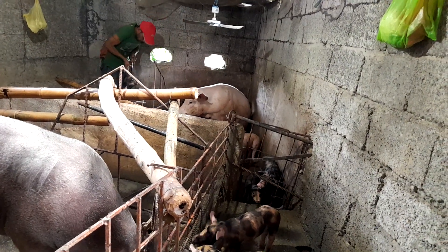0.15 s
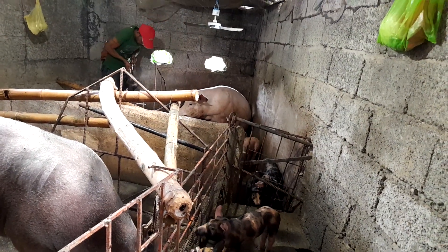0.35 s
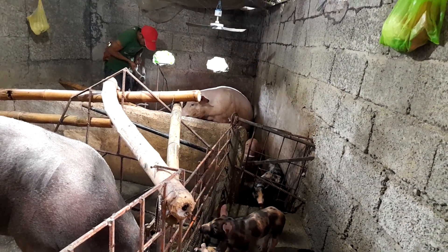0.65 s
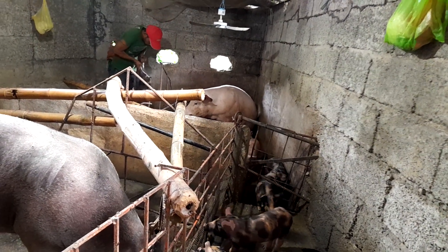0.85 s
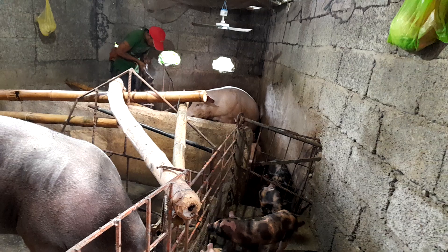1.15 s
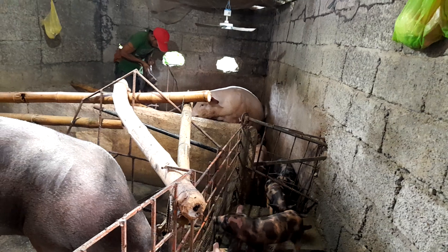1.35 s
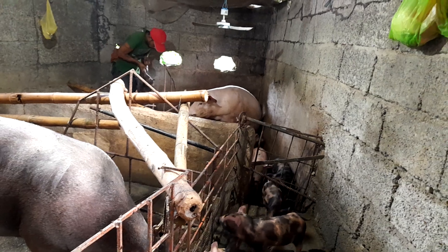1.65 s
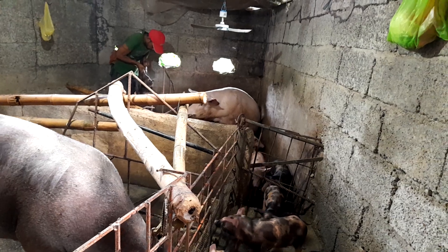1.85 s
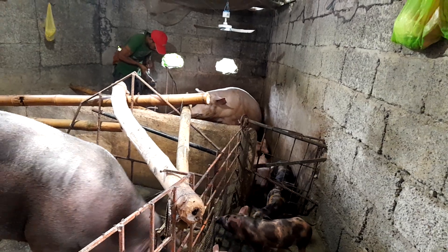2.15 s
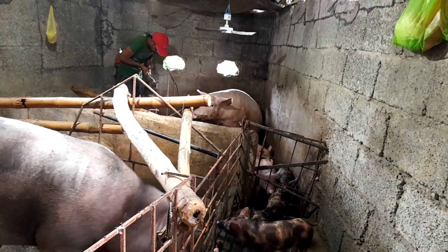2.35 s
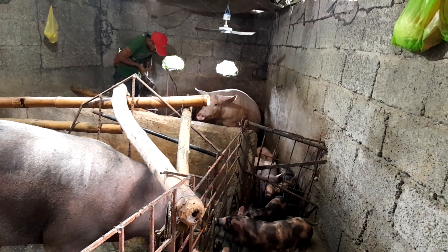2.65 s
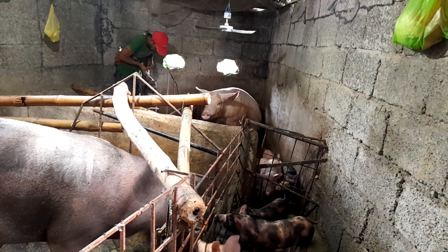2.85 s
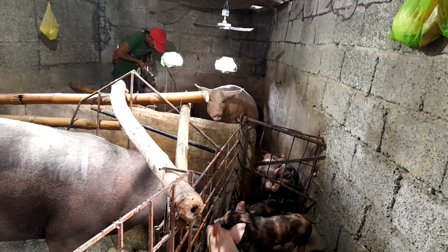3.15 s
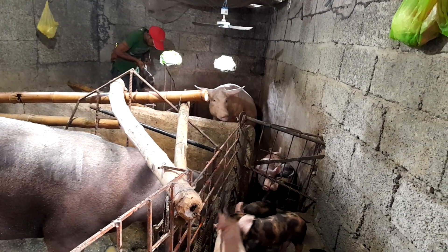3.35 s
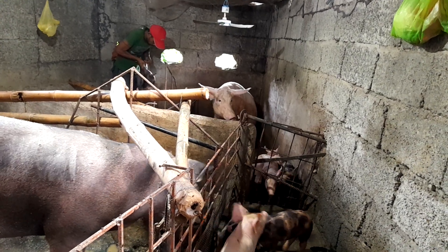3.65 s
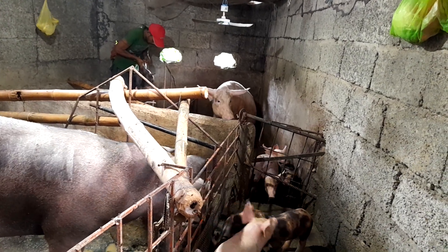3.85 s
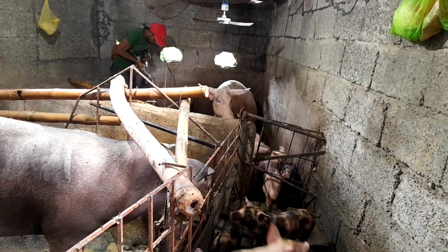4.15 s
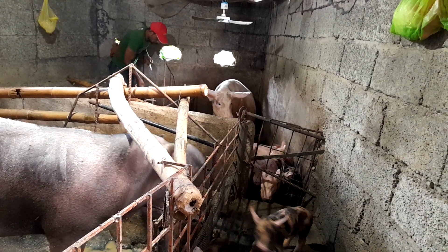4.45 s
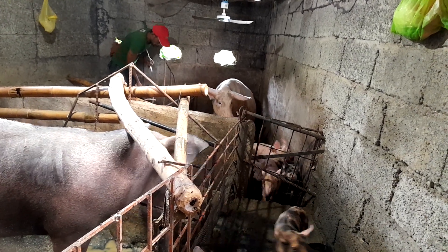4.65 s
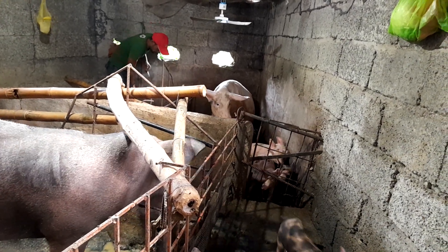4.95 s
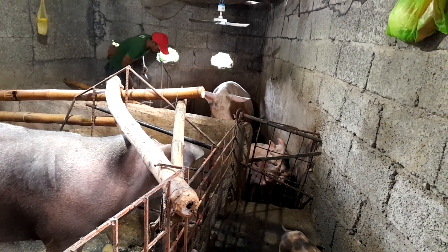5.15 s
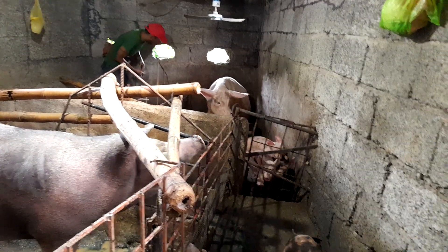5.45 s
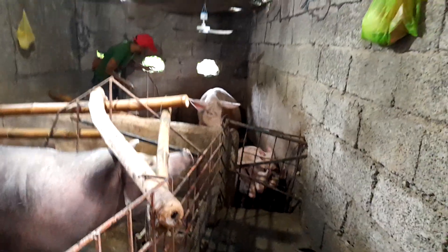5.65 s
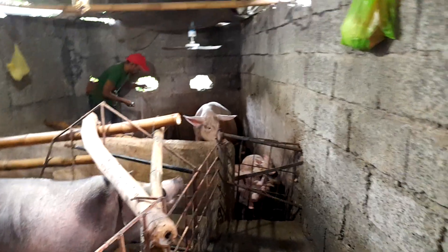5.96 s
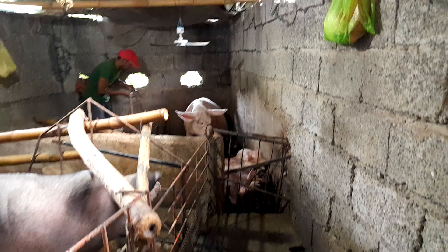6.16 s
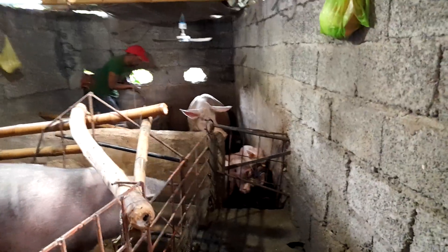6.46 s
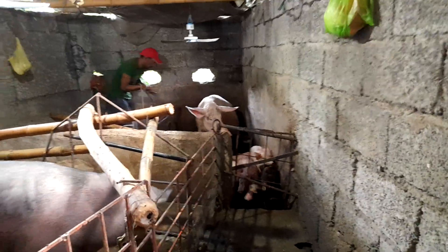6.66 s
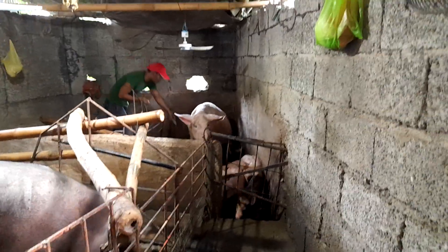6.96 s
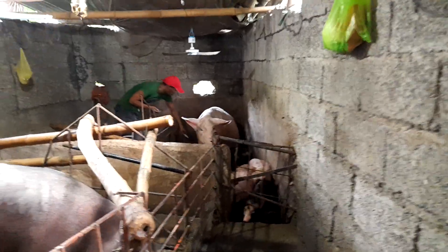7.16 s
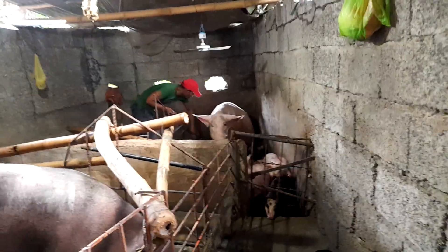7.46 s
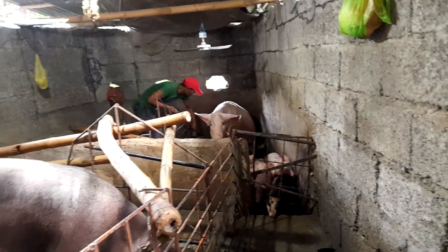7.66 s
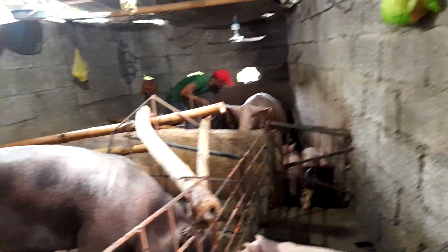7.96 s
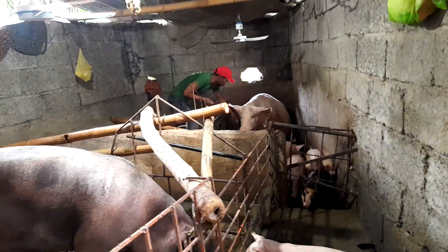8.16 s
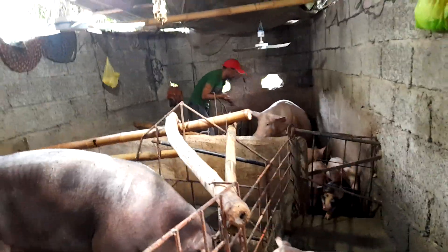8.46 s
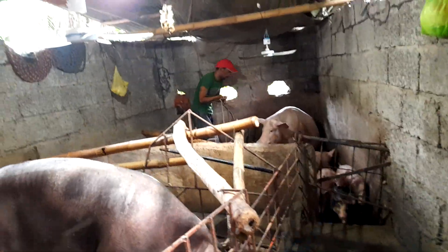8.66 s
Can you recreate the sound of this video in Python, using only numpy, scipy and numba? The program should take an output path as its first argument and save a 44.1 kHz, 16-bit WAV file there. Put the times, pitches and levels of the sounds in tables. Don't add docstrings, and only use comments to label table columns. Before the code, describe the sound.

A piglet close by barks hoarsely, then lets out piercing squeals in a hard-walled pig shed, while sows grunt, snort and clink against metal bars.

```python
import sys
import numpy as np
from scipy import signal
from scipy.fft import rfft, irfft, next_fast_len
from scipy.io import wavfile
from scipy.ndimage import uniform_filter1d, minimum_filter1d
from numba import njit

SR = 44100
rng = np.random.default_rng(int(sys.argv[2]) if len(sys.argv) > 2 else 0)


def to_wav(sig):
    pcm = np.clip(np.atleast_2d(sig), -1, 1) * 32767
    pcm = np.round(pcm).astype(np.int16)
    wavfile.write(sys.argv[1], SR, pcm.T)


def attenuation_scalar(level_db):
    decades = np.asarray(level_db, float) / 20
    return 10 ** decades


N = 388962
TIME = np.arange(N) / SR
SLOW_TIME = TIME[::64]

# (frequency [Hz], level [dB])
SHED_AIR = [(15, -70), (25, 5.5), (157, 2.5), (486, -5), (1820, -17), (2810, -8.5), (6490, -19.5),
            (8730, -25.5), (13800, -20), (15800, -30)]
SHED_AIR_DB = -51.5
LULL_S, LULL_HALF_LENGTH_S, LULL_DB = 5.28, .12, -7
# (frequency [Hz], level [dB])
PHONE_SHADOW = [(300, 12), (1200, 1.5), (2400, -12), (4400, -10), (8000, -5.5), (15000, -2)]

# (time [s], peak level [dB], ring [Hz], t60 [s])
TICKS = [(0.575, -35, 1300, .01), (1.72, -31, 2370, 0.0061), (2.473, -26, 1500, .01),
         (4.497, -25, 3000, 0.022), (4.594, -35, 3400, .01), (4.793, -18.5, 4230, 0.0023),
         (5.69, -35, 1500, 0.0088), (5.787, -12, 3170, 0.01), (5.926, -6, 4260, 0.0017),
         (5.951, -15.5, 915, 0.0036), (5.997, -14.5, 2920, 0.0016), (6.067, -37, 3170, 0.012),
         (6.482, -30, 832, 0.094), (6.775, -24.5, 2680, 0.0025), (6.929, -28.5, 2880, 0.014),
         (7.004, -23, 3500, 0.023), (7.021, -18, 3500, 0.028), (7.774, -33.5, 668, 0.099),
         (8.099, -23.5, 3110, 0.027), (8.159, -33, 3100, 0.0098), (8.268, -28, 4120, 0.0042),
         (8.523, -42, 695, 0.017), (8.691, -17, 3200, 0.0035)]
# (time [s], level [dB], pitch [Hz], t60 [s])
THUMP = [
    (1.98, -24, 64, .6),
]

# (peak time [s], hold [s], level [dB], brightness [dB])
SNORTS = [(5.377, 0.019, -60.5, -22.5), (5.504, 0.0079, -44, -29), (5.781, 0.011, -32.5, -8.5),
          (5.912, .005, -54, 33.5), (6.02, 0.015, -41, -3), (6.227, 0.019, -46, -2),
          (6.487, 0.0068, -43, 1), (6.768, 0.011, -45, 6.5), (6.938, 0.01, -38, -8),
          (7.027, 0.0088, -33.5, -4.5), (7.248, 0.066, -46, -4), (7.611, 0.011, -46.5, -2),
          (7.795, 0.091, -40.5, -7), (8.041, 0.12, -41.5, -2.5), (8.271, 0.017, -42, 9),
          (8.566, 0.018, -39.5, -3), (8.693, 0.028, -34, 2)]
# (frequency [Hz], width [Hz], level [dB])
SNOUT = [(1244, 44, -6), (1760, 1200, -6.5), (2950, 330, -1), (3900, 1500, -1.5), (6200, 970, -2),
         (11000, 2500, 0.5)]

# (peak time [s], hold [s], chest level [dB], nose re chest [dB], nose resonance [Hz])
FAR_GRUNTS = [(0.0, .01, -50, 5, 440), (0.104, .01, -56, 18, 462), (0.318, 0.016, -46.5, 9, 423),
              (0.614, 0.035, -51.5, 14, 470), (0.777, 0.077, -44, -1, 332), (0.918, 0.11, -37, -1.5, 320),
              (1.162, 0.21, -52.5, 6.5, 424), (1.44, 0.018, -50.5, 16, 514), (1.788, 0.0079, -43, 0.5, 544),
              (2.017, 0.024, -34.5, 4.5, 299), (2.27, .01, -47.5, 5, 430), (2.47, 0.032, -42, 0, 440),
              (3.373, 0.051, -53.5, -25, 336), (3.914, 0.0091, -54, -14, 497), (4.12, 0.16, -50, -5, 348)]
# (peak time [s], hold [s], chest level [dB], nose re chest [dB], nose resonance [Hz])
NEAR_GRUNTS = [(4.42, 0.11, -42, -2, 296), (4.64, 0.011, -38, -4, 472), (4.841, 0.0091, -40, -1.5, 486),
               (5.081, 0.026, -40.5, -4.5, 465), (5.221, 0.0072, -55, -22, 407),
               (5.517, 0.0067, -45, 5.5, 302), (5.75, 0.16, -40.5, 1.5, 332), (6.02, 0.043, -35, -3, 447),
               (6.26, 0.0054, -32.5, -6.5, 422), (6.63, 0.028, -42, 2, 467), (6.942, 0.043, -37.5, -4, 450),
               (7.04, 0.025, -39.5, 3, 314), (7.286, 0.018, -32, -3.5, 441), (7.632, 0.048, -40, -1.5, 427),
               (7.848, 0.027, -33.5, 0.5, 331), (8.07, 0.089, -35, -2.5, 413),
               (8.28, 0.004, -35.5, -6, 554), (8.57, 0.048, -48.5, 7.5, 310), (8.71, 0.037, -33, -4.5, 427)]

# (throat opens [s], peak level [dB], brightness [dB], mouth resonance [Hz], palate resonance [Hz])
BARKS = [
    (.058, -30, -3, 2690, 3900),
    (.318, -28, -5, 2665, 4100),
    (.574, -26, -3.5, 2850, 3900),
    (.848, -29.5, -1, 2650, 4000),
]
# (throat opens [s], peak level [dB], brightness [dB], mouth resonance [Hz], palate resonance [Hz])
PANTS = [
    (4.369, -36.5, -9, 2510, 4100),
    (4.494, -43, -11, 2960, 4260),
    (4.594, -28.5, -14, 2820, 3450),
    (4.791, -34.5, -13.5, 2410, 3220),
    (5.04, -46.5, -11, 2590, 3840),
]
# (time [s], effort [dB], brightness [dB], mouth resonance [Hz])
CRIES = [
    [(1.13, -46, -18, 2640), (1.2, -42, 0.5, 2760), (1.29, -40.5, 1, 2540), (1.36, -21, -15.5, 2450),
     (1.39, -36, 2.5, 2240), (1.45, -22.5, -4.5, 2650), (1.52, -45, -0.5, 2740), (1.62, -62, -29, 2680)],
    [(1.686, -61, -41, 2360), (1.72, -27, -18, 2860), (1.84, -26, -7.5, 2728), (1.95, -16, -17, 2390),
     (2.06, -38, -18.5, 2950), (2.2, -49, -6.5, 2560)],
    [(2.236, -33.5, -9.5, 2140), (2.265, -12.5, -7.5, 2620), (2.33, -20.5, -16.5, 2530),
     (2.38, -34, -5, 2460), (2.46, -71, -12.5, 2500)],
    [(2.474, -28.5, -7.5, 2680), (2.55, -18, -5, 2990), (2.8, -19.5, -5.5, 2350), (2.94, -18.5, -9, 3040),
     (3.3, -20.5, -10, 2580), (3.39, -101, -18, 2290), (3.5, -66, -15, 2530)],
    [(3.54, -45, -1, 2820), (3.59, -32, 3.5, 2660), (3.65, -30, -3.5, 3840), (4.1, -20, -10, 3070),
     (4.22, -18, -10, 2830), (4.34, -104, 14, 2780)],
]
# (palate resonance [Hz], scoop [share], throat level [dB])
CRY_JAW = [
    (4270, 0.24, 5),
    (3500, 0.64, -3.5),
    (3400, 0.35, -4),
    (3900, 0.49, -4.5),
    (4000, 0.37, 0),
]
# (time [s], whistle [Hz], fold rate [Hz], hoarseness re clear tone [dB])
SQUEALS = [
    [(1.295, 2050, 1300, -11), (1.335, 2640, 1272, -19), (1.41, 2520, 1276, -3)],
    [(2.25, 2500, 561, -4), (2.29, 2708, 587, -4), (2.38, 2763, 563, -3)],
    [(1.69, 1900, 800, -15), (1.735, 2650, 800, -22), (1.77, 2930, 800, -24), (1.85, 2760, 700, -23),
     (1.94, 2680, 620, -18), (2.02, 2660, 600, -6)],
    [(2.55, 2877, 720, -4), (2.63, 2850, 780, -7), (2.69, 2770, 900, -4), (2.76, 2648, 730, -5),
     (2.82, 2690, 680, -21), (2.94, 2830, 640, -19), (3.1, 2823, 635, -19), (3.25, 2840, 625, -21),
     (3.31, 2840, 610, 0)],
    [(3.63, 2757, 563, -3), (3.74, 2785, 557, -30), (3.87, 2772, 554.4, -38), (3.96, 2835, 567, -38),
     (4.02, 2790, 558, -38), (4.11, 2800, 560, -30), (4.18, 2885, 600, -12), (4.25, 2800, 705, -5)],
]
SQUEAL_FOLDS = [
    (.07, .13, .6),
    (.55, .04, .6),
    (.05, .17, .6),
    (.97, .038, .08),
    (.9, .025, .6),
]
SIDEBANDS = (.15, .5, .8, .7, 1.1, .6, .25)
# (peak time [s], hold [s], level [dB], pitch [Hz], waver [share])
CHIRPS = [(0.111, 0.02, -27.5, 2296, 0.027), (0.144, .01, -41, 1360, 0.026),
          (0.365, 0.031, -28.5, 4300, .035), (0.367, 0.027, -56, 1330, 0.16),
          (0.459, .01, -38.5, 2100, 0.11), (0.628, .02, -33, 2567, .05), (0.886, 0.024, -29.5, 4150, 0.026),
          (4.374, 0.033, -41, 2380, 0.048), (4.629, 0.021, -32, 2017, 0.054),
          (4.636, 0.015, -45, 1345, 0.049), (4.853, 0.025, -34, 2170, 0.0254),
          (4.856, 0.014, -43, 1107, 0.0283), (7.537, 0.026, -61, 1415, 0.071),
          (7.83, .03, -38.5, 2750, 0.052), (8.35, 0.11, -62, 1664, 0.0086),
          (8.717, 0.024, -48.5, 1208, 0.051), (0.124, .02, -37, 4660, 0.025), (.13, .02, -36, 6700, 0.047),
          (0.353, .03, -38, 6540, 0.046), (0.389, .02, -48, 2680, .03), (0.623, .02, -33, 5900, 0.048),
          (.9, .03, -51.5, 6300, 0.046), (1.216, .09, -36.5, 3900, 0.024), (1.24, .05, -44.5, 1306, 0.014),
          (1.25, .03, -40, 2530, 0.019), (1.29, .03, -32.5, 4980, 0.032), (1.414, .06, -26.5, 5040, .04),
          (1.38, .09, -28.5, 6510, 0.034), (2.228, .02, -39, 1173, 0.026), (2.5, .03, -29.5, 1722, .05),
          (2.596, .13, -45, 875, 0.0306), (2.633, .06, -26.5, 8406, 0.021), (2.868, .22, -41, 1347, .025),
          (3.549, .01, -37, 1867, 0.037), (3.552, .04, -48.5, 968, 0.059), (3.578, .05, -35.5, 1706, 0.051),
          (3.626, .04, -40.5, 3350, .03), (3.3, 0.022, -26.5, 2455, 0.057), (4.21, 0.038, -22, 2507, 0.056),
          (2.0, 0.02, -33.5, 3300, .1), (4.6, 0.035, -42.5, 731, 0.095), (7.02, 0.037, -50, 650, .08)]
# (time [s], pitch [Hz])
BARK_PITCH = [(0, 440), (1.2, 401.7), (1.5, 540), (2.2, 523), (3.55, 478), (4.4, 427.8), (5.3, 440)]
# (frequency [Hz], width [Hz], level [dB])
BARK_MOUTH = [(440, 18, -9.5), (1385, 31, 1.5), (2990, 680, 8.5), (6180, 275, 14), (6100, 510, 17.5),
              (13480, 10000, 18.5)]
# (frequency [Hz], level [dB])
SQUEAL_MOUTH = [(300, -62.5), (560, -36.5), (1100, -10), (1700, -5), (2250, 0.5), (3000, 12), (4400, -3.5),
                (6100, -1), (7400, -11.5), (9000, -18.5), (11500, -13), (14000, -8.5), (15800, -17.5)]


def curves(table):
    s, *columns = np.transpose(table)
    return [np.interp(TIME, s, column) for column in columns]


def colour(x, points):
    size = next_fast_len(x.shape[-1])
    hz, db = np.transpose(points)
    log_hz = np.log(np.fft.rfftfreq(size, 1 / SR) + 1)
    gain = attenuation_scalar(np.interp(log_hz, np.log(hz), db))
    return irfft(rfft(x, size) * gain, size)[..., :x.shape[-1]]


def even(x, span_s=0.14):
    power = uniform_filter1d(x ** 2, int(span_s * SR)).clip(0)
    return x / np.sqrt(power + 1e-12)


def band(x, lo_hz, hi_hz):
    return signal.sosfilt(signal.butter(3, [lo_hz, hi_hz], "bandpass", fs=SR, output="sos"), x)


def share(x, lo_hz, hi_hz):
    size = next_fast_len(len(x))
    hz = np.fft.rfftfreq(size, 1 / SR) + 1

    def above(edge_hz):
        return np.sin(np.pi / 4 * (1 + (np.log(hz / edge_hz) / .09).clip(-1, 1))) ** 2

    return irfft(rfft(x, size) * above(lo_hz) * (1 - above(hi_hz)), size)[:len(x)]


def walk(rate_hz):
    k = int(SR / rate_hz)
    held = np.repeat(rng.standard_normal(N // 20)[:N // k + 1], k)
    return uniform_filter1d(uniform_filter1d(held, k), k)[:N]


def bursts(peak_s, hold_s, db, slopes):
    peak_s, hold_s, db = (np.reshape(v, (-1, 1)) for v in (peak_s, hold_s, db))
    rise = slopes[0] * (peak_s - SLOW_TIME).clip(0)
    fall = slopes[1] * (SLOW_TIME - peak_s - hold_s).clip(0)
    return db - rise - fall


def blend(levels_db, *traits):
    power = attenuation_scalar(2 * levels_db.clip(-120))
    total = power.sum(axis=0)
    tracks = [10 * np.log10(total)]
    for trait in traits:
        tracks.append((power * np.reshape(trait, (len(power), -1))).sum(axis=0) / total)
    return [np.interp(TIME, SLOW_TIME, track) for track in tracks]


@njit
def resonance(x, hz, width):
    y, b, l = np.empty(len(x)), 0., 0.
    for i in range(len(x)):
        g, k = np.tan(np.pi * hz[i] / SR), width / hz[i]
        v = (b + g * (x[i] - l)) / (1 + g * (g + k))
        b, l, y[i] = 2 * v - b, l + 2 * g * v, k * v
    return y


@njit
def flap(hz, stretch, size):
    pulses, phase, p, k = np.zeros(len(hz)), np.empty(len(hz)), 0., 0
    for i in range(len(hz)):
        p += hz[i] * stretch[k] / SR
        if p >= 1:
            p, k = p - 1, k + 1
            pulses[i] = size[k]
        phase[i] = p
    return pulses, phase


def folds(hz, jitter, scatter_db, air_db, puff):
    chance = rng.standard_normal((N // 40, 2)).T
    pulses, phase = flap(hz, np.exp(jitter * chance[0]), attenuation_scalar(scatter_db * chance[1]))
    air = rng.standard_normal(N) * np.exp(-phase / puff)
    return pulses / pulses.std() + attenuation_scalar(air_db) * air / air.std()


def tract(x, modes, drift_db):
    out = np.zeros(N)
    for k, (hz, width, db) in enumerate(modes):
        ring = resonance(x, hz * attenuation_scalar(drift_db * walk(7.7)), 1. * width)
        out += (-1) ** k * attenuation_scalar(db) / np.sqrt(width) * ring
    return out


def shed(near):
    mid, side = colour(rng.standard_normal((2, N)), SHED_AIR)
    side = signal.sosfilt(signal.butter(1, 600, "highpass", fs=SR, output="sos"), side)
    recent_power = uniform_filter1d(near ** 2, int(1.8 * SR), origin=int(.6 * SR))
    loud_db = 10 * np.log10(recent_power + 1e-9)
    duck_db = -.45 * (loud_db + 34.0).clip(0)
    lull_db = LULL_DB * np.exp(-((TIME - LULL_S) / LULL_HALF_LENGTH_S) ** 2)
    stir_db = 2.0 * walk(1.31) + 2.9 * walk(6.6)
    return attenuation_scalar(SHED_AIR_DB + duck_db + lull_db + stir_db) / mid.std() * np.array([mid + side, mid - side])


def walls(x, t60_low, t60_high):
    t = TIME[:SR // 2]
    low, left, right = rng.standard_normal((3, len(t))) * (1 - np.exp(-t / 0.0011))
    bass = .6 * band(low, 40, 700) * 1000 ** (-t / t60_low)
    fade = 1000 ** (-t / t60_high)
    tails = [bass + band(v, 700, 7000) * fade + band(v, 7000, 16000) * fade ** 2 for v in (left, right)]
    loudness = np.linalg.norm(tails[0])
    return np.array([signal.fftconvolve(x, tail / loudness)[:N] for tail in tails])


def scatter(x):
    t = TIME[:SR // 16]
    smear = band(rng.standard_normal(len(t)) * np.exp(-t / .024), 900, 18000)
    low = signal.sosfilt(signal.butter(2, 900, fs=SR, output="sos"), x)
    treble = signal.fftconvolve(x, smear / np.linalg.norm(smear))[:N]
    return np.roll(low + treble, -16)


def knocks():
    out, t = np.zeros(N), TIME[:SR // 2]
    cracks = rng.standard_normal((len(TICKS), len(t))) * np.exp(-t / .0006)
    for (s, db, hz, t60), crack in zip(TICKS, cracks):
        hit = 0.28 * crack + np.sin(2 * np.pi * hz * t) * 1000 ** (-t / max(t60, .002))
        i = int(s * SR)
        out[i:i + len(t)] += (attenuation_scalar(db) * hit)[:N - i]
    (s, db, hz, t60), = THUMP
    i = int(s * SR)
    lean = (1 - np.exp(-t / 0.04)) * 1000 ** (-t / t60)
    out[i:i + len(t)] += attenuation_scalar(db) * lean * np.sin(2 * np.pi * hz * t)
    return out


def sniffs():
    s, hold, db, bright_db = np.transpose(SNORTS)
    snuffling = bursts(6.05, 9, -57, (80, 80))
    return blend(np.vstack([bursts(s, hold, db, (250, 159)), snuffling]), np.r_[bright_db, 0])


def snorts():
    db, bright_db = sniffs()
    low_db = -15.0 - 0.123 * (db.clip(-70) + 34.0)
    top_db = bright_db - 15 - 0.3 * (db.clip(-75) + 26.5)
    source = folds(np.full(N, 60.), jitter=.3, scatter_db=9, air_db=0, puff=1.0)
    air = tract(source, SNOUT, drift_db=1.48)
    for hz in (1000, 2800, 4100):
        air += 0.023 * resonance(source, hz * attenuation_scalar(1.9 * walk(15)), 300.0)
    parts = ((1800, 5200, 0), (700, 1800, low_db), (5200, 15800, top_db))
    return attenuation_scalar(db) * sum(attenuation_scalar(part_db) * even(band(air, lo, hi)) for lo, hi, part_db in parts)


def rumbles(lead_s):
    far, near = np.transpose(FAR_GRUNTS), np.transpose(NEAR_GRUNTS)
    far_db = bursts(far[0] - lead_s, *far[1:3], (257, 138))
    near_db = bursts(near[0] - lead_s, *near[1:3], (264, 210))
    mutter_db = np.full((1, len(SLOW_TIME)), -73)
    nose_db, nose_hz = np.r_[far[3], near[3], 3.0], np.r_[far[4], near[4], 400.]
    return blend(np.vstack([far_db, near_db, mutter_db]), nose_db, nose_hz)


def grunts():
    chest_db = rumbles(0)[0]
    early_db, nose_db, nose_hz = rumbles(0.021)
    nose_hz = nose_hz * attenuation_scalar(.5 * walk(12))
    source = folds(56 * attenuation_scalar(1.5 * walk(4.8)), jitter=.17, scatter_db=3, air_db=-5, puff=.6)
    chest_hz = 160 * attenuation_scalar(.9 * walk(7))
    chest = resonance(resonance(source, chest_hz, 130.0), chest_hz, 79.0)
    chest += 0.18 * band(source, 74, 180.0)
    chest += 0.37 * resonance(np.roll(source, SR // 3), 1.394 * chest_hz, 38.0)
    nose = resonance(resonance(source, nose_hz, 56.0), nose_hz, 240.0)
    nose += 0.22 * resonance(source, 1.61 * nose_hz, 274.0)
    nose += 0.2 * band(source, 310, 652)
    return attenuation_scalar(chest_db) * even(chest, span_s=.1) - attenuation_scalar(early_db + nose_db) * even(nose, span_s=.1)


def chirps():
    out, waver, flicker = np.zeros(N), walk(60) + walk(400), attenuation_scalar(6.7 * walk(120))
    for s, hold, db, hz, waver_share in CHIRPS:
        on = (TIME > s - .1) & (TIME < s + .4)
        t = TIME[on] - s
        pitch = hz * (1 - 0.044 * (-t / 0.027).clip(0, 2) + waver_share * waver[on])
        level_db = db - 620 * (-t).clip(0) - 1200 * (t - hold).clip(0)
        out[on] += attenuation_scalar(level_db) * flicker[on] * np.sin(2 * np.pi * np.cumsum(pitch) / SR)
    return out


def squeal():
    tone, absent, hoarse_db = np.zeros(N), np.ones(N), np.zeros(N)
    wobble, flutter = .6 * walk(40) + .6 * walk(250), walk(120)
    swell = attenuation_scalar(4.5 * np.array([walk(70) for _ in range(13)]))
    for table, (chop, waver, alone) in zip(SQUEALS, SQUEAL_FOLDS):
        on = (TIME >= table[0][0]) & (TIME < table[-1][0])
        whistle_hz, fold_hz, hoarse_db[on] = (c[on] for c in curves(table))
        waver = waver * attenuation_scalar(.7 * hoarse_db[on].clip(-22))
        whistle = 2 * np.pi * np.cumsum(whistle_hz * (1 + waver * wobble[on])) / SR
        fold = 2 * np.pi * np.cumsum(fold_hz * (1 + 1.477 * waver * flutter[on])) / SR
        lock = (-(hoarse_db[on] + 10) / 15).clip(0, 1) * (table is SQUEALS[-1])
        fold = np.cumsum(np.gradient(fold) * (1 - lock) + np.gradient(whistle) / 5 * lock)
        reed = alone * swell[0, on]
        reed = reed + sum(swell[m, on] * np.exp(1j * m * whistle) for m in range(1, 6))
        gate = 0
        for n in range(-3, 4):
            gate = gate + swell[9 + n, on] * chop ** abs(n) * SIDEBANDS[n + 3] * np.exp(1j * n * fold)
        gate = gate * (1 + .1 * chop * (1 - lock) * swell[5, on] * np.cos(fold / 2))
        edge = (np.minimum(TIME[on] - table[0][0], table[-1][0] - TIME[on]) / .022).clip(0, 1)
        tone[on], absent[on] = (reed * gate).real * edge, 1 - edge
    tone = colour(tone, SQUEAL_MOUTH)
    return tone / tone[absent < 1].std(), hoarse_db + 20 * absent


def breath():
    rows, starts = [], []

    def steady(v):
        return np.full(len(SLOW_TIME), v)

    # (table, attack [s], hold [s], (rise, fall) [dB/s], scoop [share], throat [dB])
    kinds = ((BARKS, 0.046, 0.00091, (320, 280), 0.25, 0),
             (PANTS, 0.005, 0.031, (1100, 280), 0.022, -2))
    for table, attack, hold, slopes, scoop, throat_db in kinds:
        for s, db, *traits in table:
            level_db = bursts(s + attack, hold, db, slopes)[0]
            rows.append([level_db] + [steady(v) for v in traits + [throat_db]])
            starts.append((s, scoop))
    for cry, (palate_hz, scoop, throat_db) in zip(CRIES, CRY_JAW):
        s, *traits = np.transpose(cry)
        effort_db, bright_db, mouth_hz = (np.interp(SLOW_TIME, s, v) for v in traits)
        edges_db = bursts(s[0], s[-1] - s[0], 0, (350, 200))[0]
        rows.append([effort_db + edges_db, bright_db, mouth_hz, steady(palate_hz), steady(throat_db)])
        starts.append((s[0], scoop))
    return blend(*np.swapaxes(rows, 0, 1)), np.transpose(starts)[:, :, None]


def bark_voice(mouth_hz, palate_hz, jaw):
    source = folds(curves(BARK_PITCH)[0], jitter=.07, scatter_db=2.5, air_db=8.0, puff=0.37)
    rings = resonance(source, mouth_hz * jaw, 150.0)
    rings += 0.42 * resonance(source, palate_hz * jaw, 430.0)
    rings += 0.3 * resonance(source, mouth_hz * jaw / 2, 120.0)
    bark = tract(source, BARK_MOUTH, drift_db=0.53) + 0.63 * rings
    for hz in (2100, 4640, 5340, 5740, 6530, 7180):
        ring = resonance(source, hz * jaw * attenuation_scalar(0.89 * walk(9)), 190.0)
        bark += 0.17 * ring * attenuation_scalar(8.1 * walk(11))
    return bark / bark.std()


def register(tone, bark, hoarse, lo_hz, hi_hz):
    tone, bark = (share(v, lo_hz, hi_hz) for v in (tone, bark))
    power = uniform_filter1d(tone ** 2, SR // 30).clip(0) + hoarse ** 2 * bark.var()
    return even((tone + hoarse * bark) / np.sqrt(power))


def piglet():
    (db, upper_db, mouth_hz, palate_hz, throat_db), (start, scoop) = breath()
    since = SLOW_TIME - start
    shut = np.sum((since < 0) * np.exp(np.minimum(since, 0) / .04), axis=0).clip(0, 1)
    jaw = 1 - np.sum(scoop * (since >= 0) * np.exp(-since.clip(0) / 0.025), axis=0).clip(0, .6)
    opening_s = .02
    shut = uniform_filter1d(shut, int(opening_s / SLOW_TIME[1]))
    shut = np.interp(TIME - opening_s / 2, SLOW_TIME, shut)
    jaw = np.interp(TIME, SLOW_TIME, jaw)
    bark = bark_voice(mouth_hz, palate_hz, jaw)
    tone, hoarse_db = squeal()
    lag = int(.14 * SR / 2)
    tight_db = minimum_filter1d(hoarse_db.clip(-30, 12), 2 * lag + 1, origin=lag)
    tight_db = uniform_filter1d(tight_db, lag // 2)
    late_db = 40 * (jaw - 1)
    top_db = upper_db - 7.0 + late_db
    low_db = -8 + throat_db - 0.23 * (db.clip(-60) + 35.0) + 0.32 * (tight_db - 25.5) + 47.5 * (1 - jaw)
    gap_db = top_db - 16.5 + 0.57 * (db.clip(-60) + 39)
    parts = ((1800, 4500, late_db / 2), (4500, 7800, upper_db + late_db), (7800, 11300, gap_db),
             (11300, 15400, top_db), (520, 1800, low_db))
    hoarse = attenuation_scalar(hoarse_db)
    voice = sum(attenuation_scalar(part_db) * register(tone, bark, hoarse, lo, hi) for lo, hi, part_db in parts)
    return chirps() + attenuation_scalar(db - 16.0 * shut) * voice


def scene():
    small, sows, ticks = piglet(), grunts() + snorts(), knocks()
    near = np.array([scatter(small), small]) + attenuation_scalar(-5) * walls(small, .3, .33)
    near[0] = colour(near[0], PHONE_SHADOW)
    herd = np.array([attenuation_scalar(-3.5) * scatter(sows), sows]) + attenuation_scalar(-5.5) * ticks
    herd += attenuation_scalar(-6.5) * walls(sows + 0.55 * ticks, 0.23, 0.082)
    return attenuation_scalar(4.0) * near + attenuation_scalar(1.0) * herd + shed(small)


def roll_off(x):
    return signal.sosfilt(signal.butter(12, 16510, fs=SR, output="sos"), x)


def record(dry):
    x = signal.sosfilt(signal.butter(3, 52, "highpass", fs=SR, output="sos"), dry)
    x = np.tanh(attenuation_scalar(1.0) * x) * 1.038
    x = signal.sosfilt(signal.ellip(10, .5, 90, 15850, fs=SR, output="sos"), x)
    return roll_off(x)


dry = scene()
out = record(dry)
to_wav(out)
```